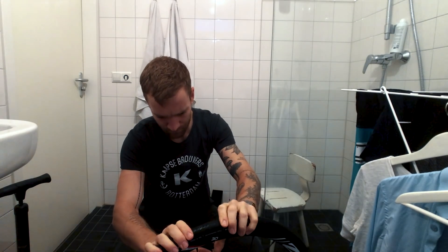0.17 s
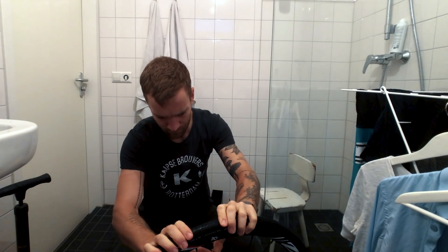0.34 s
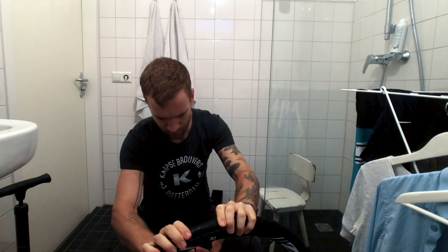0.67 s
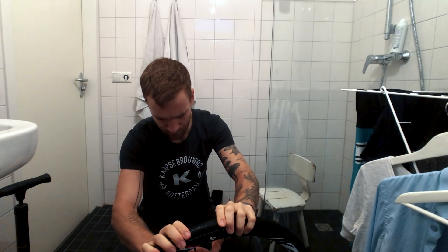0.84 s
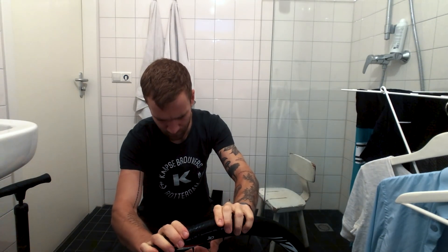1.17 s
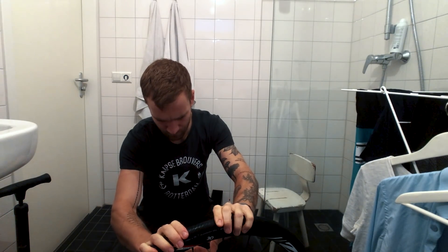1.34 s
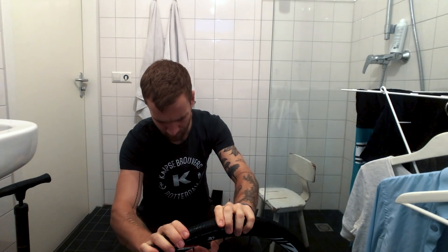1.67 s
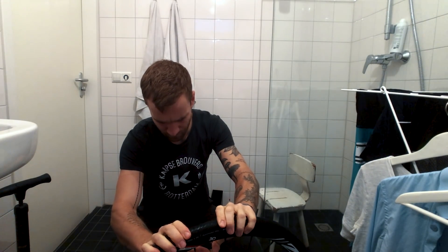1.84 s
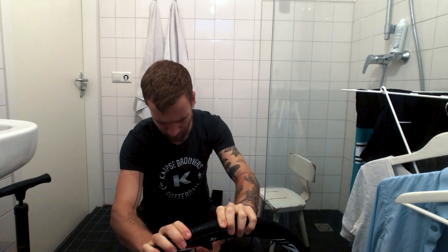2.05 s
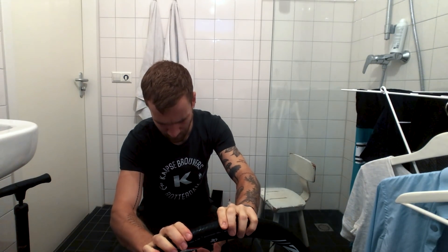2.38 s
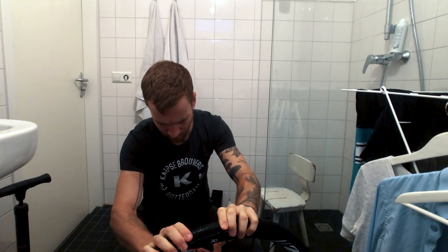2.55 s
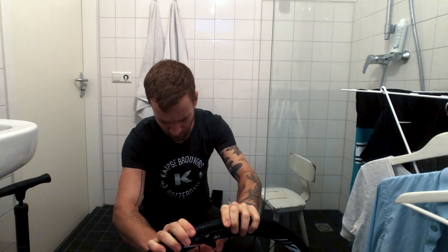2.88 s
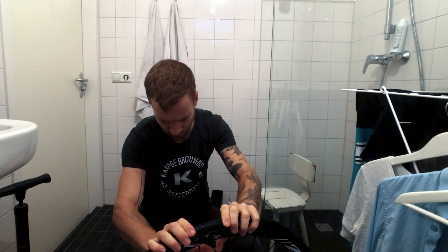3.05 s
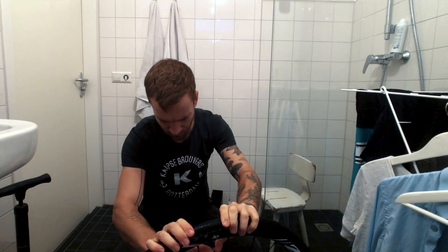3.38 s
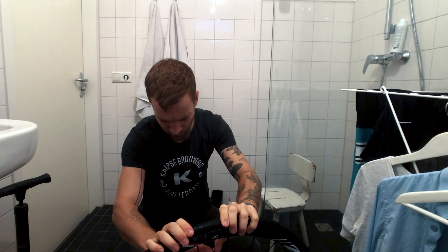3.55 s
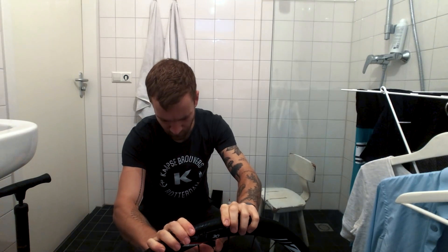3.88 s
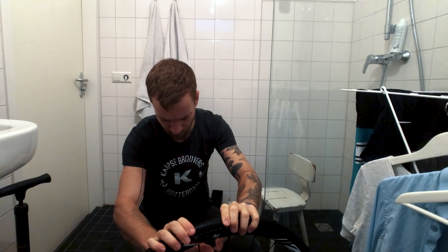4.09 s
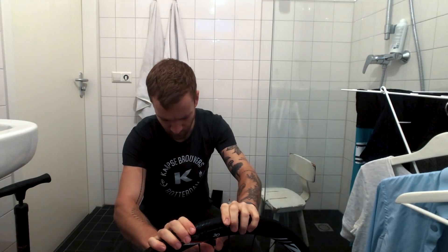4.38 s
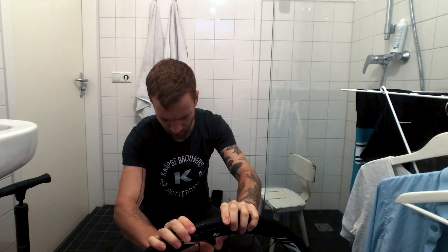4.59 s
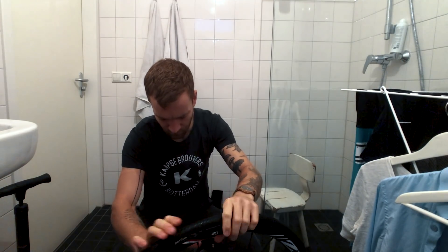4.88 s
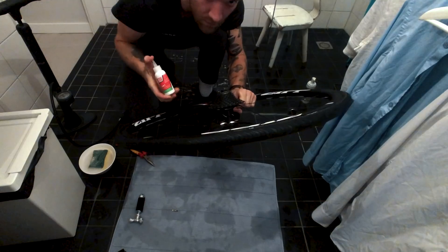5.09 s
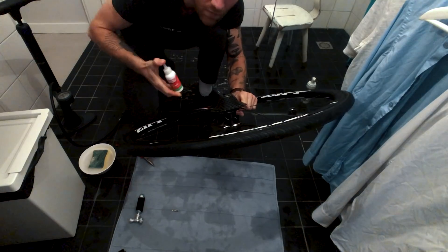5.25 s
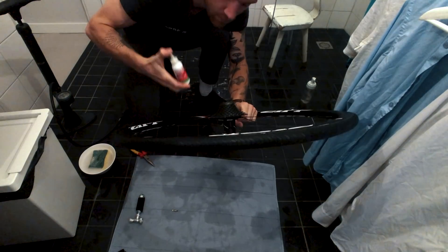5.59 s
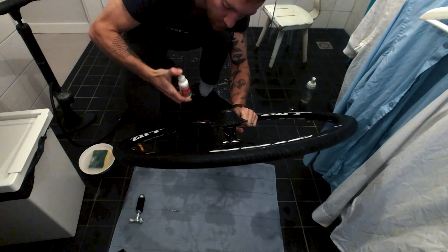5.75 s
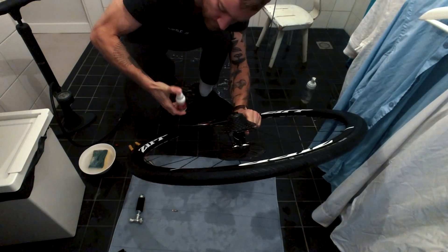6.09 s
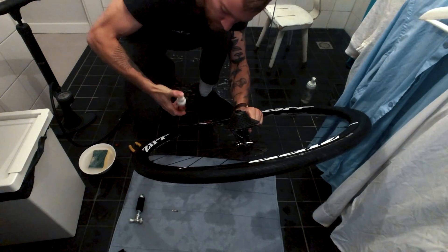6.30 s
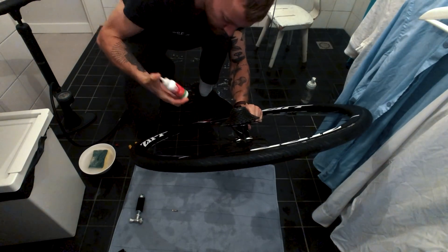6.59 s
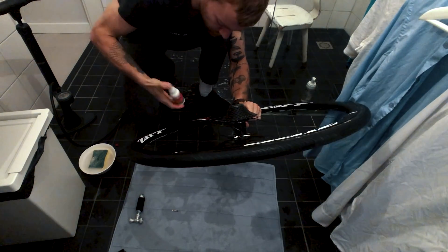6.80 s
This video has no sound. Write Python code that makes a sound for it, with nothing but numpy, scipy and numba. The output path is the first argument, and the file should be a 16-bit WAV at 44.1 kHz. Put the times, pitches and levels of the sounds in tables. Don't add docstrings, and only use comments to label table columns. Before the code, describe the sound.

Air shrieks out of a tyre valve for an instant, stops with small loose clicks, leaks faintly, then rushes out again, piercing at first, thinning and dropping in pitch to a weak breath over four seconds. Hard tiles give a short bright echo. Then a nearer, drier perspective with low rumble and room air: a plucked spoke, small handling ticks, and vigorous shaking of a half-liquid plastic bottle.

```python
import sys
import numpy as np
from scipy import signal
from scipy.fft import rfft, irfft, next_fast_len
from scipy.io import wavfile
from numba import njit

SR = 44100
rng = np.random.default_rng(int(sys.argv[2]) if len(sys.argv) > 2 else 0)


def to_wav(s):
    ch = np.atleast_2d(s).T
    pcm = np.round(np.clip(ch, -1, 1) * 32767)
    wavfile.write(sys.argv[1], SR, pcm.astype(np.int16))


def voltage_ratio(decibels):
    exponent = np.asarray(decibels, float) / 20
    return 10 ** exponent


N = 305613
TIME = np.arange(N) / SR
SHAKE_START_S = 5.518


def in_time(rows):
    s, *columns = np.transpose(rows)
    return [np.interp(TIME, s, column) for column in columns]


def rms_one(x):
    return x / np.sqrt(np.mean(x ** 2) + 1e-20)


def coloured(x, spectrum):
    hz, db = np.transpose(spectrum)
    size = next_fast_len(N)
    bins_hz = np.fft.rfftfreq(size, 1 / SR)
    gain = voltage_ratio(np.interp(np.log(bins_hz + 1), np.log(hz), db))
    gain *= np.minimum(bins_hz / hz[0], 1) ** 3
    return irfft(rfft(x, size) * gain, size)[:N]


def hiss(spectrum):
    return rms_one(coloured(rng.standard_normal(N), spectrum))


def drift(rate_hz):
    r = np.exp(-2 * np.pi * rate_hz / SR)
    noise = rng.standard_normal(N + SR)
    return rms_one(signal.lfilter([1], [1, -2 * r, r * r], noise)[SR:])


def surge(s, db, rise, fall):
    below_db = np.where(TIME < s, rise * (s - TIME), fall * (TIME - s))
    return voltage_ratio(db - below_db.clip(0, 200))


def ring(x, hz, t60):
    r, w = voltage_ratio(-60 / (t60 * SR)), 2 * np.pi * hz / SR
    return signal.lfilter([0, np.sin(w)], [1, -2 * r * np.cos(w), r * r], x + 1e-18)


def click(s, db):
    return voltage_ratio(db) * (np.arange(N) == round(s * SR))


def grains(per_s, spread_db):
    sizes = voltage_ratio(spread_db * np.minimum(rng.exponential(1, N), 5)) * rng.choice([-1, 1], N)
    return sizes * (rng.random(N) < per_s / SR)


def band_pass(x, low_hz, high_hz):
    edges = [low_hz, min(high_hz, .45 * SR)]
    return signal.sosfilt(signal.butter(2, edges, "band", fs=SR, output="sos"), x)


def blows(rows, contact_s, crack_db):
    size = SR // 4
    out = np.zeros(N + size)
    for s, db, hz, t60 in rows:
        fall = np.exp(-TIME[:size] / min(contact_s, t60 / 2))
        burst = rng.standard_normal(size) * fall / np.sqrt(np.sum(fall ** 2))
        burst[0] += .7
        ringing = ring(burst, hz, np.clip(t60, .001, .35))
        crack = band_pass(burst, hz / 1.34, 1.12 * hz)
        blow = ringing / np.abs(ringing).max() + voltage_ratio(crack_db) * crack / np.abs(crack).max()
        at = round(s * SR)
        out[at:at + size] += voltage_ratio(db) * blow
    return out[:N]


@njit
def moving_resonance(x, r, w):
    y = np.zeros(len(x))
    for i in range(2, len(x)):
        drive = (1 - r[i] ** 2) / 2 * (x[i] - x[i - 2])
        y[i] = drive + 2 * r[i] * np.cos(w[i]) * y[i - 1] - r[i] ** 2 * y[i - 2]
    return y


# pitch_hz, level_db per Hz
HUM_SPECTRUM = [(35, -40), (60, -7), (120, -12), (250, -11.5), (450, -15), (900, -18.5), (1800, -15.5),
                (3000, -26.5), (6000, -39), (12000, -32.5)]
# pitch_hz, level_db per Hz
AIR_SPECTRUM = [(18, -30.5), (30, -12), (55, -8.5), (237, -6), (369, -8.5), (532, -8.5), (921, -16),
                (1720, -19), (2130, -18), (3070, -21.5), (3490, -23), (11300, -25), (15500, -35)]


def room_floor():
    near_s, near_fade_s = 5.004, 0.04
    hum_db, air_db, mains_far_db, mains_near_db = -67, -53.5, -77, -60
    mains_hz, mains_width_hz = 49.4, 5.7
    close = np.clip((TIME - near_s) / near_fade_s, 0, 1)
    rumble = rms_one(ring(rng.standard_normal(N), mains_hz, 3.1 / mains_width_hz))
    rumble *= voltage_ratio(mains_far_db + close * (mains_near_db - mains_far_db))
    air = close ** 2 * voltage_ratio(air_db + 0.57 * drift(26)) * hiss(AIR_SPECTRUM)
    return voltage_ratio(hum_db) * hiss(HUM_SPECTRUM) + rumble + air


# pitch_hz, t60_s
ROOM_DECAY = [(200, 1), (1000, 0.78), (4000, 0.44), (9000, 0.29), (15000, 0.22)]


def bathroom(x):
    late_db, late_longer = -27, 1.3
    room_hz, room_t60 = np.transpose(ROOM_DECAY)
    t, tail = TIME[:SR // 2], 0
    for hz in 62.5 * 2 ** np.arange(9):
        t60 = np.interp(np.log(hz), np.log(room_hz), room_t60)
        fall = voltage_ratio(-60 * t / t60) + voltage_ratio(late_db - 60 * t / t60 / late_longer)
        fall = fall * np.clip(t / 0.00035, 0, 1)
        octave = band_pass(rng.standard_normal(len(t)), hz / np.sqrt(2), hz * np.sqrt(2))
        tail = tail + octave * fall / np.sqrt(np.sum(fall ** 2))
    return signal.fftconvolve(x, tail)[:N]


# pitch_hz, level_db per Hz
CLOTH_SPECTRUM = [(1000, 10), (2000, 2), (3000, 8), (4000, 1), (5500, -6), (9500, 5), (16000, -13)]


def sleeve():
    brush = surge(5.33, -53, rise=272, fall=61) * voltage_ratio(2.8 * drift(30)) * hiss(CLOTH_SPECTRUM)
    return (TIME < SHAKE_START_S) * brush


# pitch_hz, level_db per Hz
TYRE_SPECTRUM = [(80, -11), (150, -3), (300, 2), (450, -4), (700, -2), (1100, -15), (3000, -60)]


def tyre_thump():
    return surge(.17, -42, rise=3000, fall=170) * hiss(TYRE_SPECTRUM)


# start_s, peak_db,
# pitch_hz, t60_s
TOUCHES = [ (.426, -57, 1220, 0.056), (4.8, -40, 3370, 0.019), (0.539, -49, 3700, 0.01),
           (.541, -50, 2600, 0.022), (2.66, -50, 338, 0.026), (4.809, -39.5, 1750, 0.024),
           (4.83, -54, 1570, .25), (4.815, -56, 310, 0.083), (4.813, -55, 510, 0.0094),
           (4.813, -51, 1100, 0.042), (0.59, -55, 1730, 0.027), (5.189, -49, 3400, .004),
           (5.208, -48, 4200, 0.0075), (5.209, -49, 6500, 0.0035), (5.277, -45, 2900, 0.012),
           (5.37, -53, 1710, 0.33), (4.9, -54, 1590, .2), (5.395, -60, 3050, .02),
           (5.64, -31, 1247, 0.14), (6.3, -32, 930, 0.0097), (6.842, -37, 815, 0.048),
           (.166, -32, 320, .03), (.167, -42, 1150, .05), (.408, -51, 3500, .01), (.423, -42, 3450, .01),
              (.424, -54, 1600, .01), (.547, -52, 1170, .16), (.6, -59, 1170, .12), (.558, -53, 2040, .12),
              (.538, -52, 4100, .015), (.538, -54, 2100, .015), (.546, -56, 2490, .06),
              (.64, -63, 2490, .12)]


def touches():
    return blows(TOUCHES, contact_s=.005, crack_db=-5)


# pitch_hz, level_db, t60_s
SPOKE_MODES = [(1320, -24, .3), (1353, -12, 0.8), (1462, 1, 0.9), (1530, -6, 0.16), (1560, -16, 0.22),
               (2270, -13, 0.5), (2794, -15, 0.33), (3225, -13, 0.36), (3470, -18, 0.23),
               (8600, -11, 0.061)]
# start_s, level_db
SPOKE_PLUCKS = [
    (5.012, -55),
    (5.043, -47),
    (5.063, -48.5),
    (5.078, -52),
    (5.103, -50),
    (5.127, -68),
]


def spoke():
    free_below_hz = 1400
    plucks = sum(click(s, db) for s, db in SPOKE_PLUCKS)
    damped = voltage_ratio(-700 * np.maximum(TIME - 5.16, 0))
    out = np.zeros(N)
    for hz, db, t60 in SPOKE_MODES:
        mode = voltage_ratio(db) * ring(plucks, hz, np.clip(t60, .05, 1.2))
        out += mode * damped if hz > free_below_hz else mode
    return out


# start_s, slosh_db, hollow_db, spray_db
SHAKE_TURNS = [(5.523, -47, -66, -45.5), (5.543, -40.5, -32, -45.5), (5.628, -37, -33, -40.5),
               (5.734, -40.5, -35, -44), (5.76, -41.5, -58, -63), (5.818, -38.5, -52, -47),
               (5.865, -41.5, -59, -53), (5.928, -40, -45, -57), (5.942, -50, -60, -51),
               (5.98, -48, -58, -55), (6.003, -46, -60, -48.5), (6.028, -43.5, -62, -61),
               (6.082, -43.5, -60, -53), (6.12, -36, -42, -47), (6.181, -43, -58, -42),
               (6.196, -34.5, -40, -48), (6.29, -40.5, -33, -44.5), (6.325, -38.5, -64, -52.5),
               (6.365, -48, -58, -48), (6.39, -43, -44, -60), (6.42, -45, -58, -66),
               (6.47, -43.5, -48, -49), (6.49, -34.5, -41, -46.5), (6.546, -44, -63, -49.5),
               (6.579, -41, -62, -54), (6.595, -47, -64, -53), (6.664, -40, -69, -45),
               (6.69, -42, -58, -47), (6.732, -38.5, -68, -46), (6.763, -41.5, -34, -46),
               (6.8, -64, -60, -63), (6.842, -37, -57, -48), (6.89, -46.5, -65, -57),
               (6.918, -46, -64, -50)]
# pitch_hz, level_db per Hz
SLOSH_SPECTRUM = [(350, -12.5), (600, -11.5), (712, -17.5), (967, -17), (1880, -4.5), (2060, -5.5),
                  (3110, -0.5), (4600, -10.5), (5980, -37), (10100, -120)]
# pitch_hz, level_db per Hz
SPRAY_SPECTRUM = [(2470, -9), (4200, -9), (5100, -1.5), (6020, -8), (7110, -6.5), (9810, -6), (15100, -23),
                  (15800, -17)]
# pitch_hz, width_hz, level_db
HOLLOW_MODES = [(300, 27, 1), (397, 58, 6), (500, 27, -2.5)]


def sloshing_liquid():
    slosh_swell, hollow_swell, spray_swell = np.zeros((3, N))
    for s, slosh_db, hollow_db, spray_db in SHAKE_TURNS:
        slosh_swell += surge(s, slosh_db, rise=2198, fall=269)
        hollow_swell += surge(s, hollow_db, rise=2198, fall=269)
        spray_swell += surge(s, spray_db, rise=2198, fall=269)
    drops = grains(3000 * voltage_ratio(4.0 * drift(90)), 1.7)
    dealt = rng.integers(0, 16, N)
    bubbles = sum(ring(drops * (dealt == k), hz, 10.0 / hz)
                  for k, hz in enumerate(np.geomspace(700, 4300, 16)))
    slosh = rms_one(coloured(bubbles, SLOSH_SPECTRUM))
    spray = rms_one(coloured(grains(6000 * voltage_ratio(5 * drift(40)), 3.2), SPRAY_SPECTRUM))
    slaps = grains(400, 0.63)
    hollow = rms_one(sum(voltage_ratio(db) * ring(slaps, hz, 7.8 / width) for hz, width, db in HOLLOW_MODES))
    bed = slosh_swell * slosh + spray_swell * spray + voltage_ratio(-8.0) * hollow_swell * hollow
    return (TIME > SHAKE_START_S) * bed


# start_s, peak_db, pitch_hz
WALL_KNOCKS = [(5.522, -25, 3240), (5.535, -26, 3300), (5.587, -40, 1370), (5.624, -29, 1500),
               (5.71, -40, 1350), (5.735, -24, 3300), (5.758, -29, 2350), (5.817, -31, 3430),
               (5.928, -27, 1380), (5.976, -31, 2230), (6.026, -34, 3100), (6.078, -23, 2870),
               (6.117, -30.5, 3500), (6.125, -41, 2970), (6.148, -39, 2200), (6.18, -40, 3630),
               (6.197, -23.5, 2280), (6.297, -23.5, 1530), (6.386, -28, 1880), (6.421, -37, 2300),
               (6.488, -18.5, 2000), (6.517, -31, 1950), (6.548, -44, 1560), (6.576, -31, 2720),
               (6.662, -29, 2020), (6.73, -27.5, 3730), (6.759, -35, 2590), (6.837, -27, 2880),
               (6.878, -21, 3190),
               (5.628, -32.5, 810), (5.551, -42, 1520), (5.762, -34, 1500), (5.82, -39, 2600),
             (6.604, -36, 3300), (6.712, -35, 2000), (6.76, -32, 1900), (6.896, -37, 3080),
             (5.631, -31, 2290), (5.636, -30, 1770), (5.91, -36, 1360), (5.97, -38, 1130),
             (5.993, -32, 3270), (6.08, -36, 1310), (6.19, -34, 2000), (6.212, -34, 2300),
             (6.242, -32, 1710), (6.292, -35, 694), (6.311, -27.5, 1540), (6.491, -42, 750),
             (5.538, -35, 1920), (5.941, -32, 1500), (5.551, -35, 2500), (5.602, -36, 3480),
             (5.729, -31.5, 2200), (5.862, -45, 2730), (6.027, -34, 1230), (6.1015, -36, 2740),
             (6.322, -32, 2700), (6.469, -39, 2164), (6.5, -26, 2000), (6.654, -36, 1750),
             (6.675, -26, 3150), (6.7, -26, 3270), (6.849, -34, 1500), (6.891, -33, 3050),
             (6.926, -36, 2630)]
# start_s, peak_db, pitch_hz
DROPLET_TICKS = [(5.5192, -28, 10800), (5.537, -28.5, 9050), (5.598, -38, 9100), (5.63, -33, 4900),
                 (5.7143, -42, 4730), (5.7358, -22.5, 9700), (5.857, -33, 9340), (5.885, -27, 9700),
                 (5.9394, -30.5, 5950), (6.002, -32, 5100), (6.0623, -36, 5200), (6.079, -36, 5340),
                 (6.1158, -24, 10100), (6.1805, -32, 5000), (6.213, -31, 9700), (6.2945, -27, 9600),
                 (6.3966, -33, 9500), (6.449, -32, 4630), (6.543, -31, 5100), (6.591, -34, 4960),
                 (6.6337, -33, 9800), (6.6614, -36, 8800), (6.7954, -35, 9700), (6.8387, -35, 5570),
                 (5.626, -32, 7960), (5.747, -30, 5470), (5.798, -40, 9500), (5.807, -31, 5000),
                  (5.939, -36, 11500), (5.976, -37, 4800), (6.052, -34, 9500), (6.095, -43, 5200),
                  (6.103, -34, 9550), (6.143, -36, 9700), (6.212, -39, 5000), (6.243, -32, 4830),
                  (6.334, -38, 9000), (6.478, -36, 11000), (6.543, -45, 12100), (6.602, -35, 8600),
                  (6.662, -32, 13600), (6.728, -41, 9200), (6.803, -35, 8800), (6.84, -31, 14000)]
# start_s, peak_db, pitch_hz
LIQUID_THUDS = [(5.543, -27.5, 330), (5.57, -32.5, 300), (5.605, -33, 297), (5.75, -32.5, 380),
                (5.785, -36.5, 300), (6.296, -34.5, 300), (6.402, -35, 500), (5.627, -40, 326),
                (5.724, -26.5, 356), (5.914, -31.5, 388), (5.945, -36, 370), (6.103, -39, 570),
                (6.13, -43, 402), (6.187, -40, 565), (6.199, -42, 290), (6.289, -36, 500),
                (6.391, -35, 457), (6.471, -34, 357), (6.662, -43, 360), (6.76, -31.5, 417)]


def bottle_blows():
    knocks = blows([(s, db, hz, 42 / hz) for s, db, hz in WALL_KNOCKS],
                   contact_s=.0012, crack_db=-6)
    ticks = blows([(s, db, hz, 0.0046) for s, db, hz in DROPLET_TICKS],
                  contact_s=.0008, crack_db=-6)
    thuds = blows([(s, db, hz, 33 / hz) for s, db, hz in LIQUID_THUDS],
                  contact_s=0.0024, crack_db=-4.0)
    return voltage_ratio(-2.5) * (knocks + ticks) + voltage_ratio(-5.5) * thuds


def brief_puff():
    return surge(.541, -54, rise=3000, fall=190) * hiss(SLOSH_SPECTRUM)


# start_s, centre_hz, level_db
EDGE_STAGES = [
    [(0, 11800, -15.5), (.035, 12700, -24), (.06, 16300, -19.5), (.175, 15300, -28.5)],
    [(.437, 6000, -58.5), (.48, 6000, -51.5), (.53, 5800, -64.5)],
    [(.735, 4440, -46.5), (.78, 4650, -45.5), (.815, 5100, -45.5)],
    [(.82, 5700, -46), (.875, 5400, -39), (.9, 4500, -38.5), (.925, 3600, -41), (1.0, 3400, -45),
     (1.035, 3300, -45)],
    [(1.04, 3400, -34), (1.058, 3430, -33)],
    [(1.064, 7960, -30.5), (1.076, 9730, -15)],
    [(1.08, 15000, -22.5), (1.15, 13830, -15), (1.21, 13100, -15), (1.28, 12100, -29.5),
     (1.35, 11500, -19.5), (1.42, 12200, -13), (1.46, 13200, -19), (1.52, 14400, -16), (1.58, 13800, -21.5)],
    [(1.585, 14450, -16.5), (1.65, 15600, -21.5), (1.8, 16030, -21), (1.92, 14700, -23.5),
     (1.95, 14130, -19.5), (2.0, 15930, -21), (2.12, 15360, -20), (2.228, 14300, -19.5)],
]
# start_s, centre_hz, level_db
SINKING_STAGES = [
    [(2.232, 12140, -21.5), (2.39, 11030, -22), (2.47, 11400, -24.5), (2.56, 10700, -33),
     (2.65, 9150, -31.5), (2.74, 8000, -37), (2.95, 6760, -43)],
    [(2.955, 7500, -44), (3.2, 6200, -46), (3.3, 5800, -45), (3.48, 5350, -45), (3.7, 5300, -48.5),
     (3.9, 5100, -51), (4.05, 4750, -53.5), (4.2, 4600, -54.5), (4.36, 4400, -55.5)],
    [(4.365, 4350, -56), (4.42, 3900, -57), (4.47, 3500, -54), (4.6, 3400, -55.5), (4.68, 3000, -57)],
    [(4.685, 2900, -57), (4.75, 2250, -55.5), (4.808, 2200, -58)],
]
STAGE_WIDTH = [(0.026, 0.13), (0.16, 0.14), (.1, 0.09), (0.2, 0.23), (.04, 0.049), (0.16, 0.049),
               (0.092, 0.14), (0.12, 0.12), (0.082, 0.15),
               (0.1, 0.07), (0.08, 0.15), (0.16, .07)]


def edge_tone():
    lock_s = 0.004
    stages = EDGE_STAGES + SINKING_STAGES
    hz, level_db = in_time([row for stage in stages for row in stage])
    share_rows, locked = [], np.zeros(N)
    for stage, (share_start, share_end) in zip(stages, STAGE_WIDTH):
        start_s, end_s = stage[0][0], stage[-1][0]
        share_rows += [(start_s, share_start), (end_s, share_end)]
        locked += np.clip(np.minimum(TIME - start_s, end_s - TIME) / lock_s + 1, 0, 1)
    share, = in_time(share_rows)
    locked = np.clip(locked, 0, 1)
    hz = np.clip(hz * (1 + 0.02 * drift(30)), 500, .45 * SR)
    w = 2 * np.pi * hz / SR

    width_hz = np.clip(share, .02, .5) * hz * 2.4
    flutter_db = 0.85 * drift(40) + 0.72 * drift(320)
    tone = locked * rng.standard_normal(N) * voltage_ratio(level_db + flutter_db)
    for _ in range(3):
        tone = moving_resonance(tone + 1e-18, np.exp(-np.pi * width_hz / SR), w)

    pure = share < .06
    wide_hz = np.clip(np.where(pure, 0.2, 1) * hz, 200, 6000)
    shoulder_w = np.minimum(np.where(pure, 2, 1.23) * w, 2.8)
    low = np.clip((6260 - hz) / 1000, 0, 1)
    shoulder = locked * low * rng.standard_normal(N) * voltage_ratio(level_db + np.where(pure, 4.5, 3.5))
    for _ in range(2):
        shoulder = moving_resonance(shoulder + 1e-18, np.exp(-np.pi * wide_hz / SR), shoulder_w)
    return tone * np.sqrt(SR / width_hz / 0.64) + shoulder * np.sqrt(SR / wide_hz)


# start_s, jet_flow_db, gap (0 narrow, about 1 wide)
VALVE_PUSHES = [
    [(0.0, -22.5, 1.02), (0.156, -31, 0.9), (0.176, -29, 1.15)],
    [(0.436, -57, 1), (0.49, -55, 0.85), (0.51, -67, .5)],
    [(0.704, -45, 0.5), (0.718, -29.5, 0.47), (0.82, -33.5, 0.57), (1.06, -22.5, 0.3), (1.075, -23, 0.53),
     (1.12, -24.5, 0.82), (1.29, -24.5, 0.89), (1.57, -29.5, 0.8), (2.19, -30.5, 0.64), (2.66, -32, 0.65),
     (2.95, -33, 0.01), (3.5, -37.5, 0.04), (4.05, -40, 0.04), (4.21, -42, 0.3), (4.36, -44, 0.17),
     (4.77, -46.5, 0), (4.81, -45.5, 0.4)],
]
PUSH_THROAT_LIFT = [
    3,
    4,
    -1.32,
]
# pitch_hz, level_db per Hz
JET_SPECTRUM = [(2350, -48.5), (4000, -58), (4290, -41.5), (4550, -29.5), (4920, -14.5), (5390, -12),
                (6630, -3.5), (7370, -3), (9540, 0), (12000, -4.5), (15600, -38), (22000, -120)]
# pitch_hz, level_db per Hz
ROAR_SPECTRUM = [(35, -47.5), (60, -16.5), (372, -7.5), (432, -10.5), (1530, -1), (1680, -1.5),
                 (2200, -0.5), (2860, -15), (4840, -120)]
# pitch_hz, level_db per Hz
THROAT_SPECTRUM = [(1060, -15), (1800, -6.5), (2240, -2), (2760, -0.5), (3290, -1), (4070, -3.5),
                   (4800, -3.5), (6240, -4), (10600, -120)]
# pitch_hz, level_db per Hz
FIZZ_SPECTRUM = [(9000, -21.5), (11500, -6), (13500, -4.5), (14600, -8), (15300, -7), (16500, -24.5)]
# narrow_gap_db over full flow, wide_gap_gain_db, share of flow swing followed
GAP_LAYERS = [
    (-36, 18.5, 0.64),
    (-17.5, 6, 0.67),
    (-6.5, 11.5, 0.88),
]


def jet():
    full_flow_db = -25
    spectra = (JET_SPECTRUM, ROAR_SPECTRUM, THROAT_SPECTRUM, FIZZ_SPECTRUM)
    core, roar, throat, fizz = [hiss(spectrum) * voltage_ratio(0.95 * drift(27)) for spectrum in spectra]
    out = np.zeros(N)
    for rows, throat_lift_db in zip(VALVE_PUSHES, PUSH_THROAT_LIFT):
        jet_db, gap = in_time(rows)
        inside_s = np.minimum(TIME - rows[0][0] + 0.012, rows[-1][0] - TIME + 0.01)
        gate = np.clip(inside_s / 0.0066, 0, 1) ** 2
        swing_db = jet_db - full_flow_db
        push = 0.75 * voltage_ratio(jet_db) * core
        for (db, wide_db, share), layer in zip(GAP_LAYERS, (roar, voltage_ratio(throat_lift_db) * throat, fizz)):
            push += voltage_ratio(full_flow_db + db + wide_db * gap + share * swing_db) * layer
        out += gate * push
    return out


# pitch_hz, level_db
FIXED_COLOUR = [(40, 3), (2900, -2), (3450, 2), (4100, -1.5), (4600, -0.5), (5000, -1), (5400, 0.5),
                (6600, -2.5), (7400, 3.5), (9400, 3), (10600, 2), (11200, -2), (12000, -3), (13300, -8),
                (14600, -1.5), (16500, -4)]


def valve():
    return coloured(jet() + edge_tone(), FIXED_COLOUR)


def scene():
    far = valve()
    near = sloshing_liquid() + bottle_blows() + spoke() + sleeve() + touches() + tyre_thump() + brief_puff()
    send = voltage_ratio(-2.5) * far + voltage_ratio(-10) * near
    shift = 1.517 * TIME + 0.29 * drift(0.48)
    wet = bathroom(np.cos(shift) * send) + bathroom(np.sin(shift) * send)
    return np.tile(voltage_ratio(0.5) * far + near + wet + room_floor(), (2, 1))


def top_cut(x):
    return signal.sosfilt(signal.butter(12, 16930, fs=SR, output="sos"), x)


def record(dry):
    rounded = .85 * np.tanh(dry / .85)
    mix = signal.sosfilt(signal.butter(4, 42, "high", fs=SR, output="sos"), rounded)
    mix = signal.sosfilt(signal.ellip(12, .5, 60, 15780, fs=SR, output="sos"), mix)
    return top_cut(mix)


dry = scene()
out = record(dry)
to_wav(out)
```